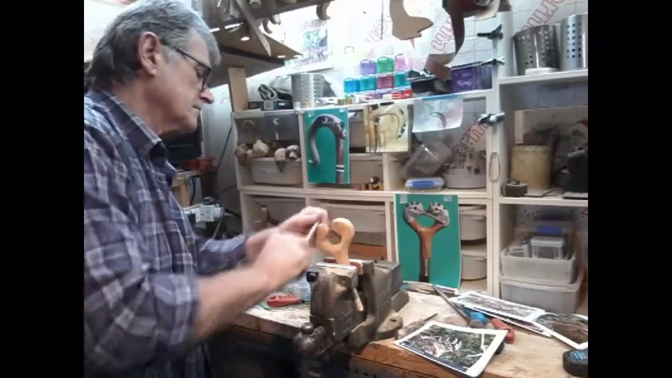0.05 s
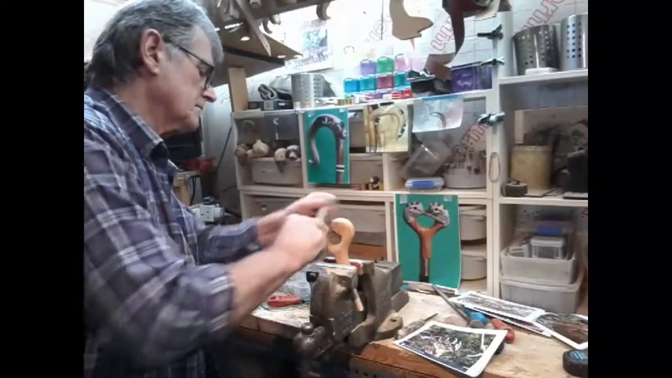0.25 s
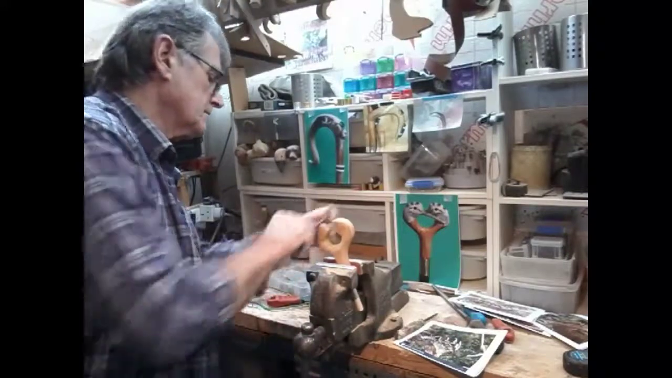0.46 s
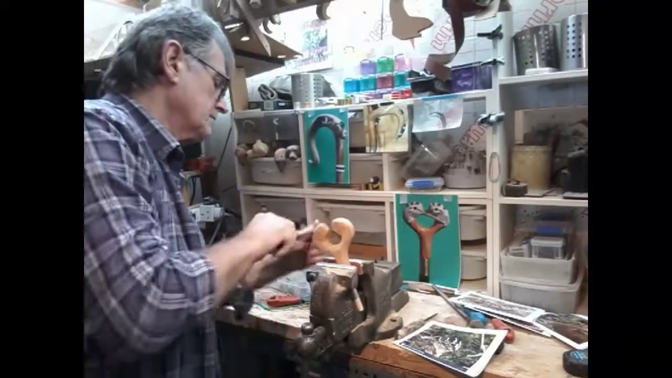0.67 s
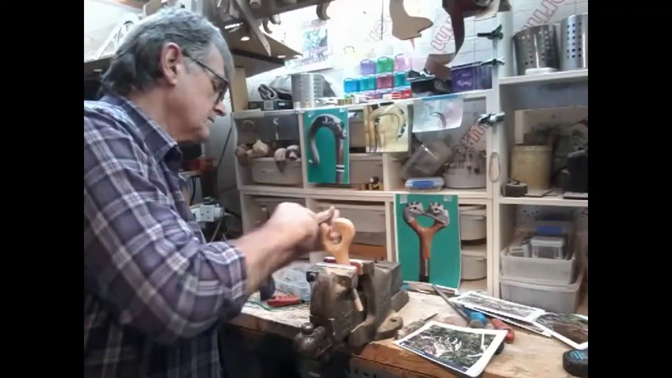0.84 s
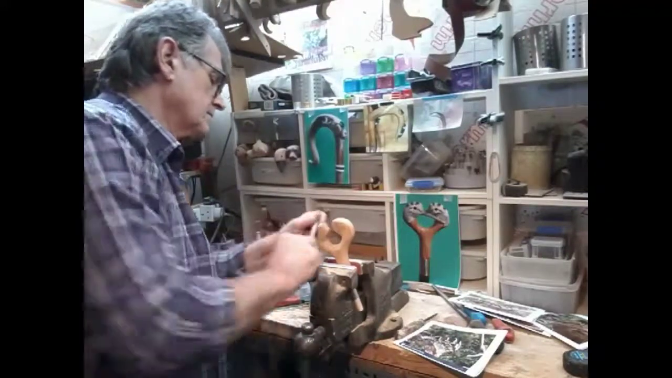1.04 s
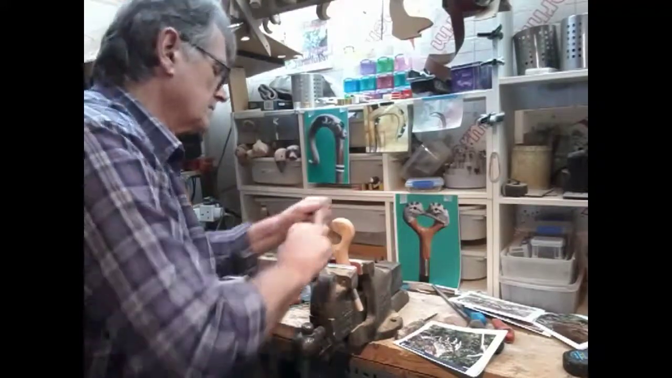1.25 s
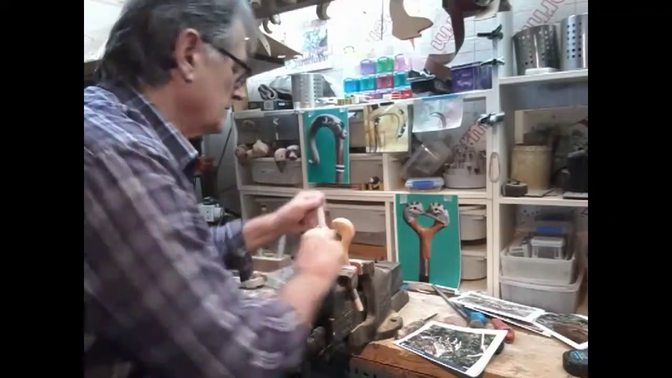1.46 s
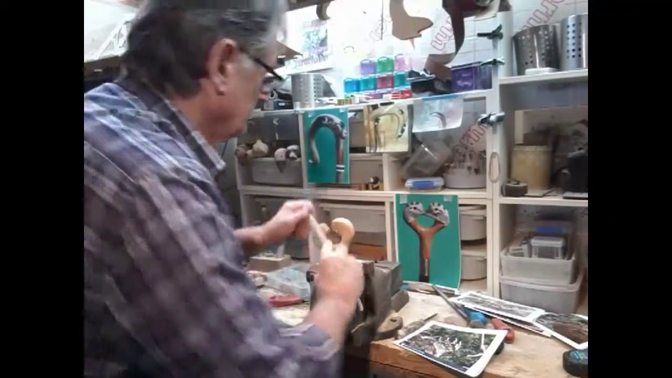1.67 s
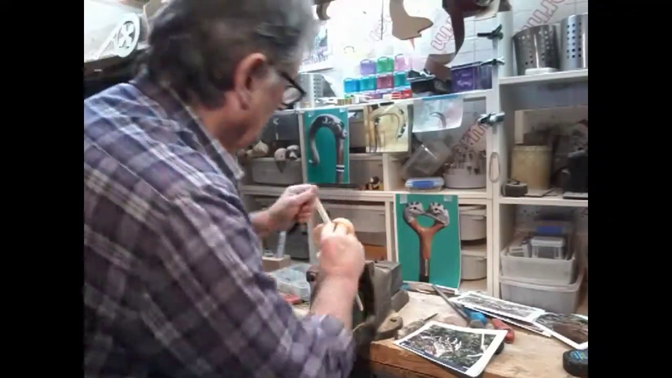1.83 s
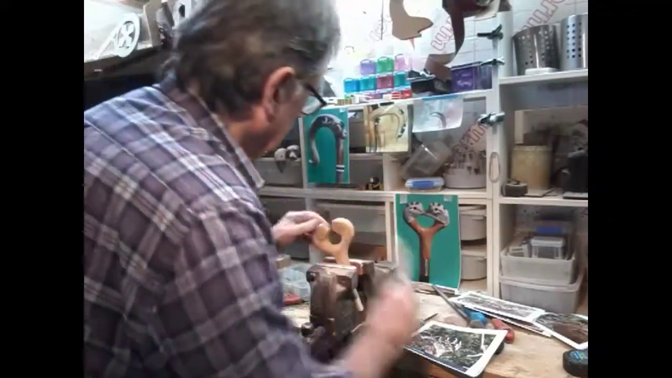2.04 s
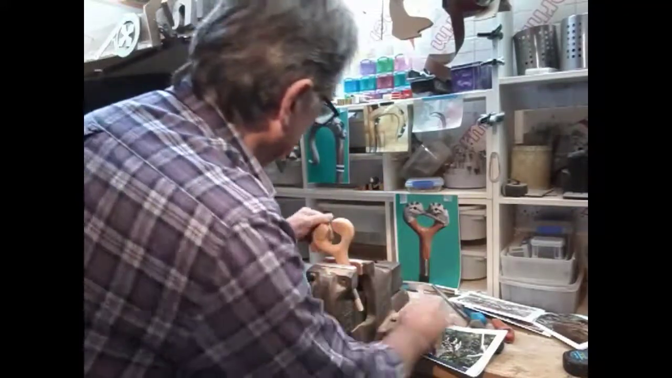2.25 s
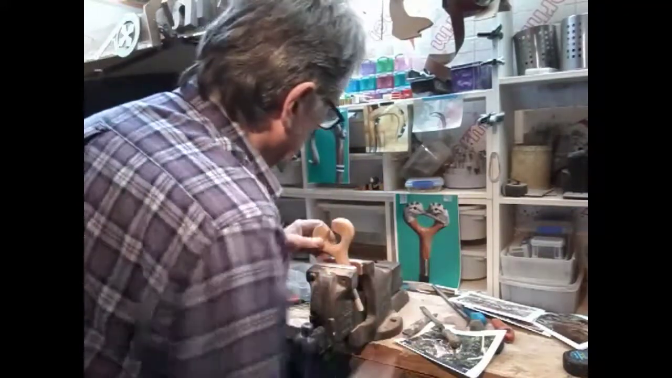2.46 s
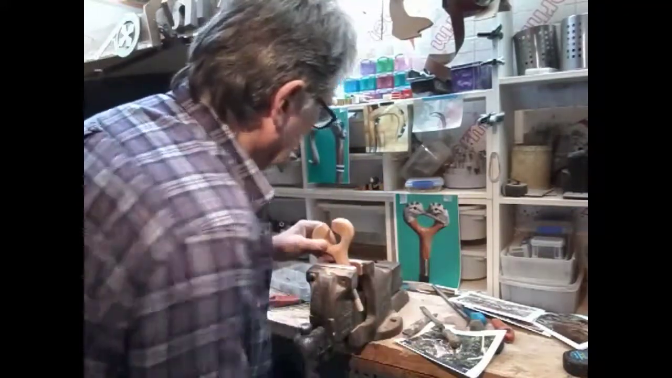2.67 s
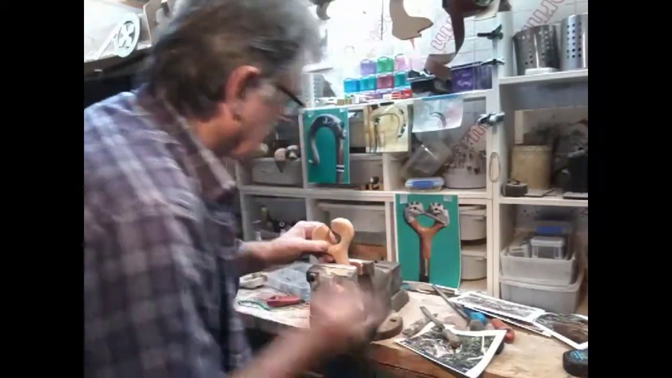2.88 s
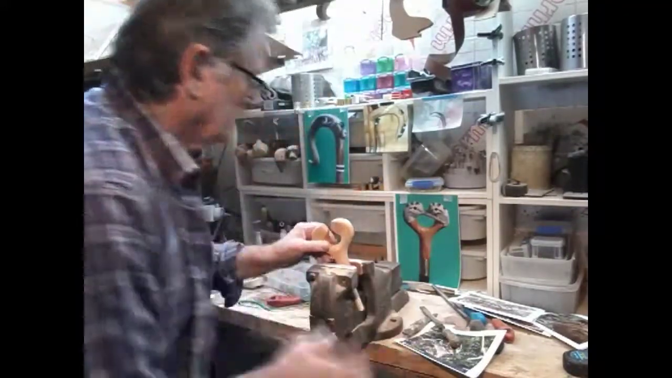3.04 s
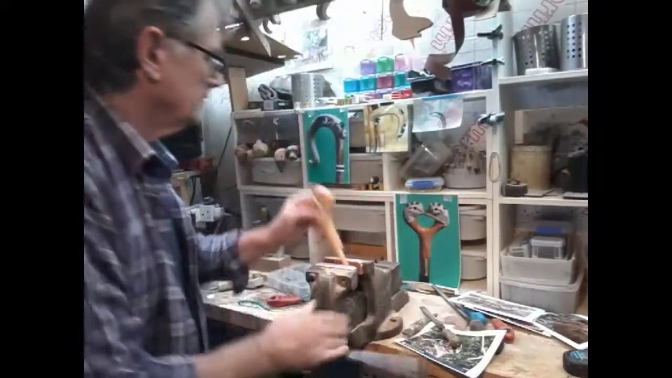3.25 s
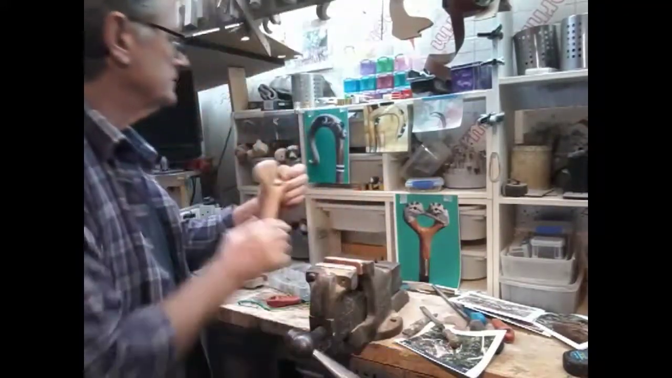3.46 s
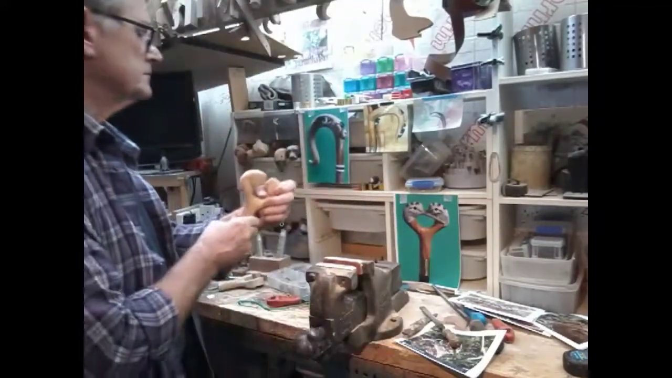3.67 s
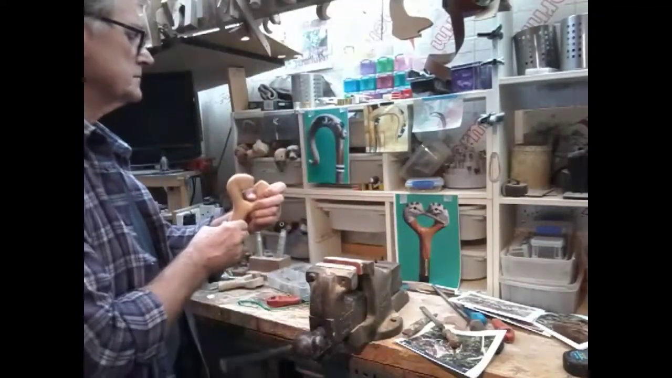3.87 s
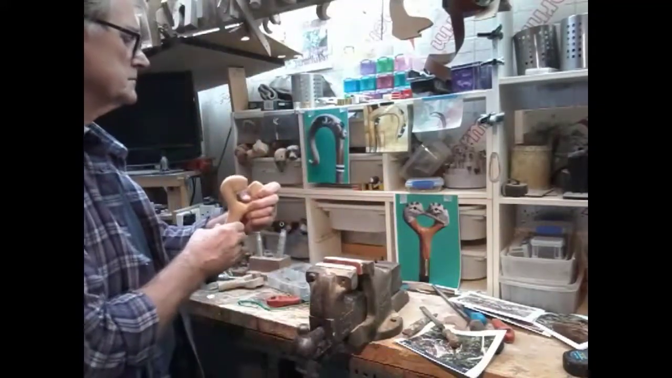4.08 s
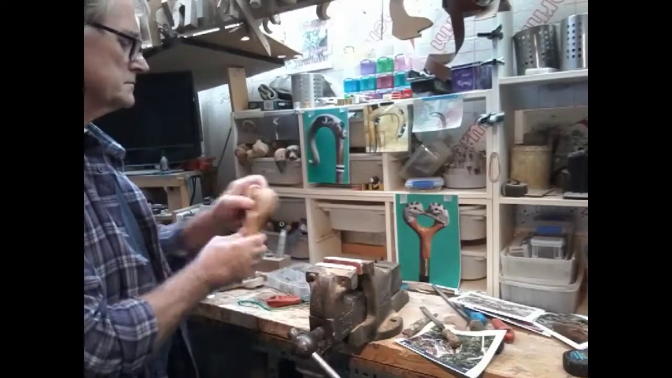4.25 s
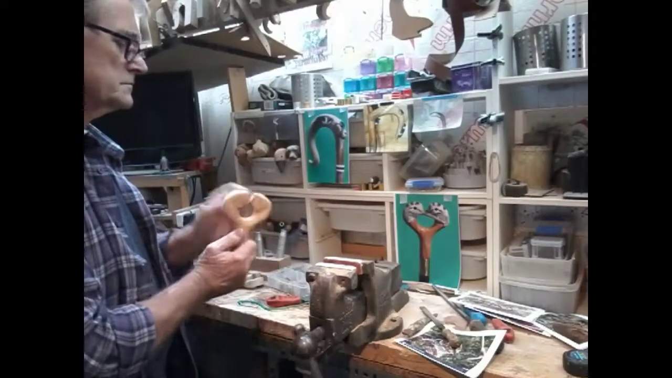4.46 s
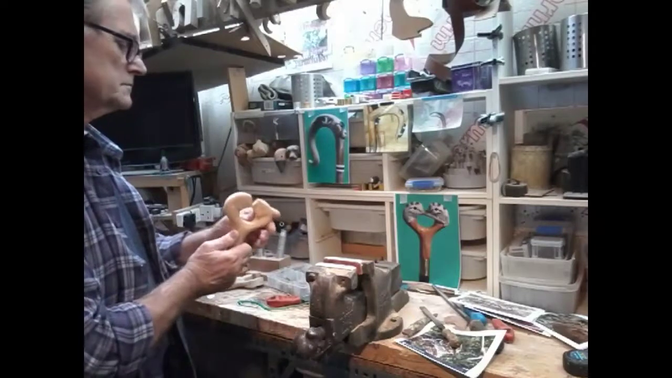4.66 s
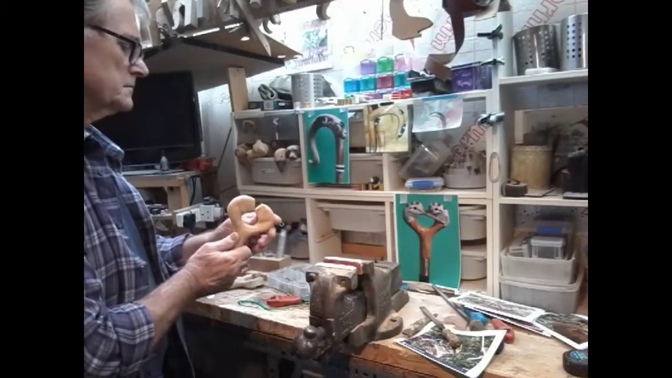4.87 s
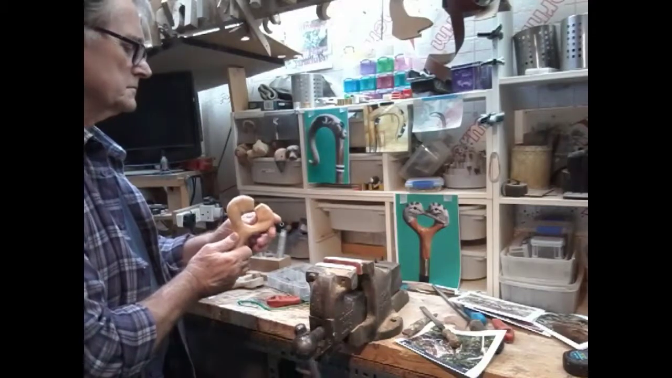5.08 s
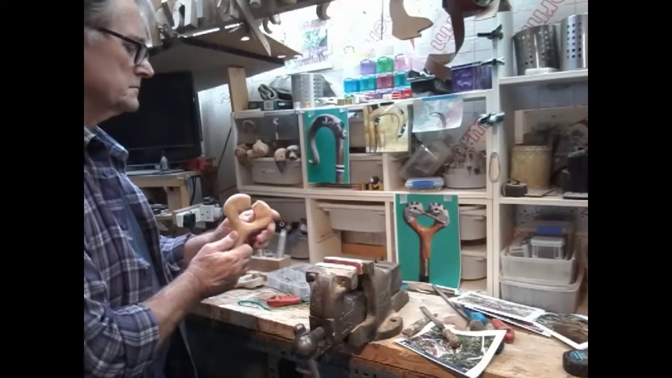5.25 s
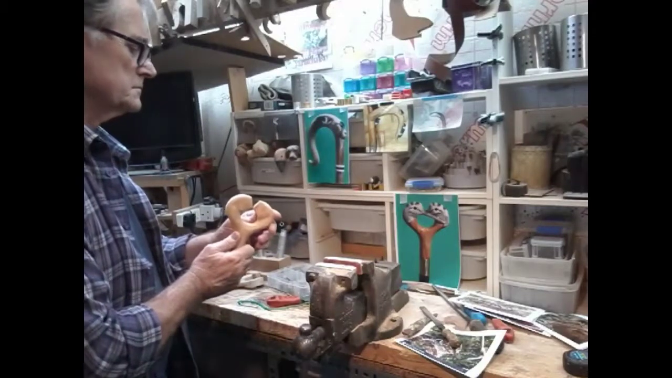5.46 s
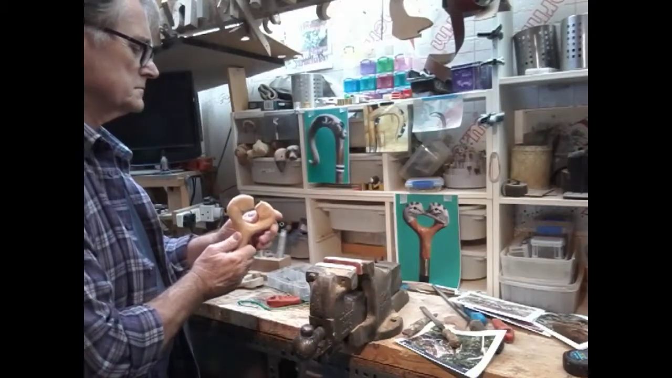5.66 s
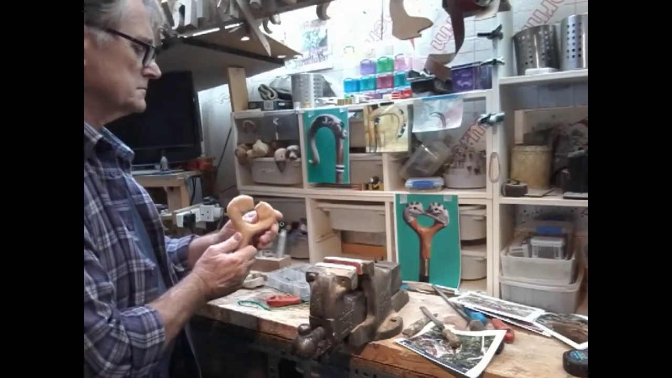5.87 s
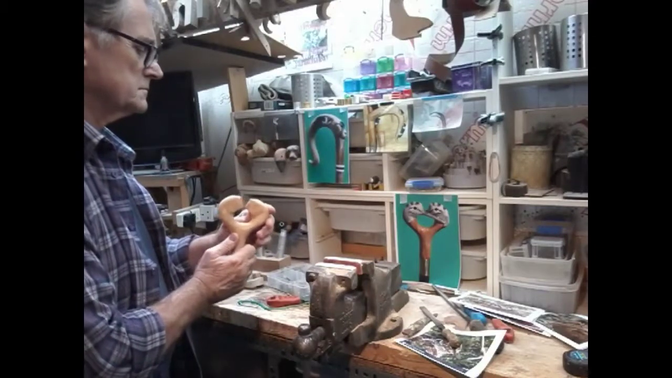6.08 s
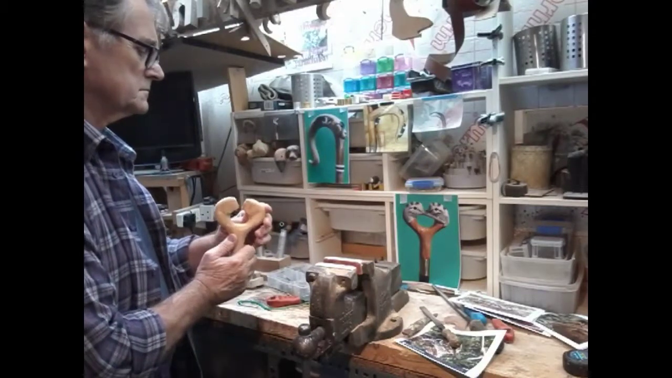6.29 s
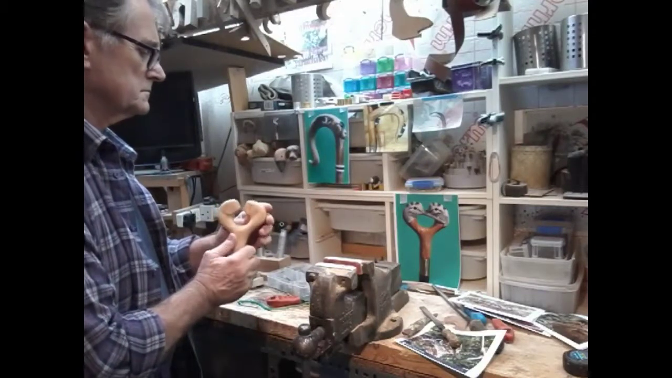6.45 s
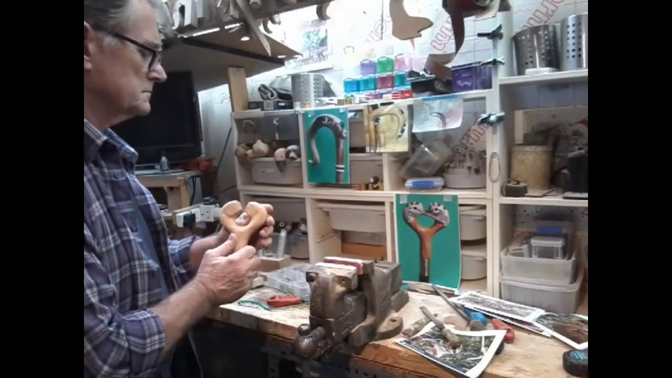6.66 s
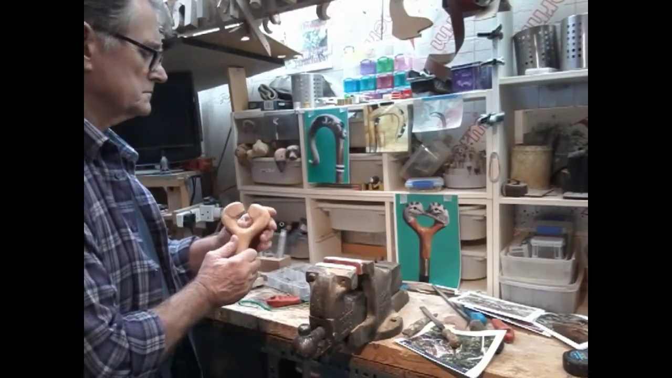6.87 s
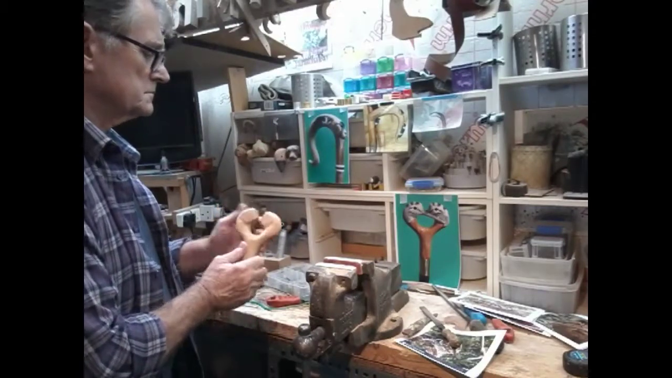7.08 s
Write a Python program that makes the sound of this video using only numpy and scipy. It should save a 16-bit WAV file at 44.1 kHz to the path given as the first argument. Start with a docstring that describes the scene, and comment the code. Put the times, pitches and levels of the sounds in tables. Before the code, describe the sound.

From the start, a hand file rasps across a wooden carving clamped in a vise: six short strokes, about three a second, each with a light tap and a gritty, woody scrape, ending near 1.8 seconds. After a brief pause, the file clatters onto the bench at 2.3 seconds, bouncing with a short steel ring. At 2.65 seconds a hard, tight double clank frees the vise screw, the loudest moment. The slack jaw knocks dully and the sliding steel handle clinks repeatedly until about 3.6 seconds, while the carving clacks lightly against the jaws around 3.3 seconds. Sparser, mostly softer clinks follow, clearest near 4.25, 5.25 and 5.7 seconds, with a faint last one at 6.1. Sleeves rustle softly over a low room rumble and a thin, high electrical whine until the end, around 7 seconds. One microphone stands beside the bench in a small workshop with short reflections.

```python
"""A hand file rasps six times across a wooden carving in a bench vise, its teeth tearing fibres
and ringing the wood. The file clatters onto the bench, a double blow frees the vise screw, and the
carving clacks out of the jaws while the sliding steel handle clinks to rest. Sleeves rustle over
a low room rumble and a thin electrical whine. One microphone, beside the bench in a small workshop."""
import sys
import numpy as np
from scipy import signal
from scipy.fft import rfft, irfft, next_fast_len
from scipy.io import wavfile
from scipy.ndimage import uniform_filter1d

SR = 44100
rng = np.random.default_rng(int(sys.argv[2]) if len(sys.argv) > 2 else 0)


def log_audio(samples):
    """Write samples as a 16-bit WAV file to the path given in sys.argv[1]."""
    # one column per channel
    frames = np.atleast_2d(samples).T
    # limit to full scale, then quantise
    limited = np.clip(frames, -1, 1)
    pcm = np.round(limited * 32767).astype(np.int16)
    wavfile.write(sys.argv[1], SR, pcm)


N = 313992
TAIL = SR // 2   # samples that a blow lasts

# decay of the workshop: pitch_hz, t60_s
WORKSHOP_DECAY = [(100, 0.47), (500, 0.27), (2000, 0.21), (6000, 0.2), (14000, 0.2)]
# arms and shirt moving: time_s, rustle_db, swish_db
SLEEVE_MOVES = [(0.0, -50.5, -64), (0.2, -53.5, -75), (0.54, -56.5, -63), (1.01, -49.5, -68),
                (1.13, -48.5, -69), (1.53, -57.5, -75), (1.78, -55, -61.5), (2.24, -56.5, -62),
                (2.72, -50, -69.5), (2.85, -47, -60.5), (3.25, -48.5, -57), (3.55, -50, -68),
                (3.73, -50.5, -70), (4.96, -55.5, -77), (5.69, -57, -80.5), (6.45, -63, -80.5),
                (6.88, -57, -80), (7.12, -54, -78.5)]
# spectra of the background: pitch_hz, density_db
RUMBLE_SPECTRUM = [(15, -49), (25, -28.5), (48, -3.5), (104, -0.5), (190, -15), (253, -13), (303, -29),
                   (328, -9), (612, -20), (881, -17.5), (1640, -31.5), (4190, -39), (5880, -36.5),
                   (9640, -47.5), (12500, -40), (16200, -76), (22000, -120)]
CLOTH_SPECTRUM = [(53, -39), (90, -5), (130, -3), (214, 1.5), (375, -15), (540, -13.5), (668, -20.5),
                  (963, -20), (4010, -43), (5890, -39), (9000, -47), (11700, -71.5), (19800, -120)]
SWISH_SPECTRUM = [(1000, 2.5), (1500, 1.5), (3000, -6.5), (4300, -11), (5300, -3.5), (6100, 3), (7200, -10),
                  (10000, -15.5), (13000, -21)]

# pushes of the file: start_s, grip_s, time_to_top_speed_s, length_s, top_teeth_per_s,
# bite_db, hiss_db, shudder_db, blade_db, jolt_db
FILE_STROKES = [ (0.037, 0.053, 0.11, 0.15, 874, -43.5, -45, -35, -38, -32.5),
                (0.375, .025, 0.061, 0.1, 642, -41.5, -43.5, -41, -39.5, -39),
                (0.65, 0.078, .115, 0.16, 720, -39, -41, -31, -37, -36.5),
                (1.014, 0.034, 0.09, 0.14, 666, -41.5, -44, -30.5, -39, -61),
                (1.359, .02, 0.053, 0.091, 740, -44.5, -49, -40, -38.5, -33),
                (1.632, 0.043, .08, 0.13, 725, -47, -50, -37.5, -44, -38)]
# how bite, hiss, shudder and blade (a row each) follow a push:
# lower_at_start_db, sag_db_per_s, release_db_per_s
STROKE_SHAPES = [(13.5, 4, 208), (28.3, 67, 146), (18.3, 12, 161.5), (26.6, 35, 260)]
# resonances of carving and file together: pitch_hz, width_hz, level_db
WOOD_RESONANCES = [(577, 91, 6.5), (916, 13, -1), (1197, 5.8, -0.5), (1489, 60, 4.5), (1700, 36, 6),
                   (2090, 136, -5.5), (2250, 9.3, -2.5), (2480, 17, -32), (2827, 57, -2), (3250, 58, -5),
                   (3460, 62, -2), (5970, 350, -0.5), (11820, 180, -18)]
# the file lands on the wood: start_s, tap_db, brightness_hz, thump_db
FILE_LANDINGS = [(0.038, -45, 2960, -37.5), (0.376, -35, 3970, -43.5), (0.652, -57, 1994, -43.5),
                 (1.012, -36.5, 5200, -63), (1.359, -32.5, 7100, -43), (1.632, -41.5, 4120, -47)]
# spectra of the file at work: pitch_hz, density_db
RASP_SPECTRUM = [(150, -59), (250, -9), (371, -1.5), (565, -18.5), (893, -7.5), (962, -15), (1430, -4),
                 (2260, -6), (2790, -25), (4800, -32), (6240, -46), (10600, -120)]
FIBRE_SPECTRUM = [(2200, -40), (3800, -10.5), (4400, -7.5), (5300, -4.5), (5750, -0.5), (6150, 4.5),
                  (6600, -7.5), (7500, -17), (10000, -21.5), (11300, -21.5), (11900, -29), (12700, -26),
                  (15000, -30)]
TAP_SPECTRUM = [(200, -41), (450, 7), (800, -5), (1500, 8), (2100, 9), (3200, 0.5), (4300, -11),
                (6200, -0.5), (7500, -23), (14000, -72)]

# the file drops on the bench: start_s, clatter_db, crack_db, ring_db
FILE_DROPS = [(2.2998, -26.5, -58, -35.5), (2.306, -22, -39.5, -32), (2.3863, -25, -32, -35.5)]
# the slack jaw knocks: start_s, knock_db, thud_db
JAW_KNOCKS = [(2.626, -52, -45.5), (2.672, -36, -32), (2.734, -41, -28.5), (3.065, -44.5, -50),
              (3.08, -44.5, -35), (3.164, -60, -40.5), (3.21, -69, -46.5), (3.449, -53, -40),
              (4.208, -53, -51), (4.465, -63.5, -60), (5.065, -59.5, -54.5), (5.531, -56.5, -64)]
# the handle is knocked against its stop: start_s, clank_db, ring_db
FREEING_BLOWS = [(2.646, -24, -25), (2.653, -20, -23.5)]
# the swinging handle strikes: start_s, ring_db, low_modes_extra_db, knock_db, jaw_ring_db,
# rebound_after_s, rebound_ring_relative_db, rebound_knock_relative_db
HANDLE_CLINKS = [(2.747, -44.5, -4, -42, -51, 0.029, -22, -12), (2.889, -32, 7, -46.5, -46.5, .015, -5, 5),
                 (2.954, -43.5, 5, -46.5, -59, 0.0086, 9, 10), (3.097, -28.5, 0, -32.5, -45, .014, 1, -7),
                 (3.376, -27, -1, -41, -40, .018, -12, -5.5),
                 (3.526, -48, -9, -45.5, -46.5, 0.01, -12, -18),
                 (3.616, -40, 6, -41.5, -39.5, 0.0084, -9, -9),
                 (3.811, -63, 24, -58.5, -65, 0.01, -17, -10), (3.882, -64, 20, -54.5, -69, .012, -26, -7),
                 (4.251, -35, 0, -46, -53.5, 0.0081, -7.5, -0.5),
                 (4.714, -65, 17, -65, -66.5, .015, -14, -11),
                 (4.805, -57, 16, -55.5, -59, .01, -10, -12.5),
                 (5.115, -54.5, 12.5, -61, -73, 0.017, -20, -12),
                 (5.2407, -35.5, 0, -58, -64, .006, 3, 3.5), (5.264, -37, 4.5, -46, -40, .012, -10, -14),
                 (5.681, -44.5, 10, -61.5, -53, .023, 4.5, 5),
                 (6.122, -56.5, 8.5, -55.5, -53, .015, -14.5, -11)]
# the carving bumps the jaws: start_s, clack_db, tick_db
CARVING_CLACKS = [(3.222, -37, -56), (3.326, -40, -58.5), (3.333, -45, -51)]
# spectra of the contacts: pitch_hz, density_db
CLATTER_SPECTRUM = [(53, -46), (90, -19), (177, -2.5), (250, -8), (315, 1.5), (397, -4.5), (491, 3.5),
                    (1440, -0.5), (1750, -5), (2570, -2), (3060, -15.5), (4500, 1.5), (5560, -4.5),
                    (6000, 4.5), (9000, -29), (11700, -53.5), (19800, -120)]   # file on bench
CRACK_SPECTRUM = [(4500, -32), (6800, 1), (8500, -4), (10000, -11), (12000, -0.5), (15500, -9.5)]   # the sharp edge of that clatter
IRON_SPECTRUM = [(150, -13), (400, 3), (750, 8.5), (1500, 5.5), (2400, 3.5), (2900, -0.5), (4200, -3),
                 (5000, -2), (6200, -9), (7100, -18), (8500, -24.5), (11000, -33.5), (15000, -52)]   # body of the vise
THUD_SPECTRUM = [(35, -29), (65, -4), (150, -6), (260, -5.5), (450, -4.5), (900, -13.5), (2000, -38.5)]   # bench under the vise
SLAM_SPECTRUM = [(53, -46.5), (90, -19), (167, -3.5), (332, -20), (765, -2.5), (1450, -16), (1690, -10),
                 (1840, -16), (2430, -13.5), (2760, -17), (3140, -9.5), (5030, -11.5), (6240, -7),
                 (9780, -27.5), (15000, -26.5)]   # handle on its stop
TICK_SPECTRUM = [(3500, -14.5), (5500, 6), (7000, -5), (9000, -7), (10000, -17.5), (12500, -19),
                 (15500, -26.5)]   # sharp steel contact
CLACK_SPECTRUM = [(300, -5), (900, -5.5), (2200, -2.5), (3000, -7), (4200, -10.5), (5100, 3.5), (6200, 1),
                  (6900, -8.5), (8000, -28), (12000, -23.5), (15000, -34)]   # wood on iron
# modes of the loose file, cast jaws, screw and steel handle: pitch_hz, level_db, t60_s
BLADE_MODES = [(1392, -3, 0.17), (2300, -5.5, .15), (4300, -3.5, .16), (4759, -1, .13), (5070, -2.5, 0.17),
               (5329, -2.5, 0.2), (5490, -8, .14), (6030, -1.5, .1), (6720, -3, 0.11), (9000, -11.5, .12),
               (11950, -25, 0.083)]
JAW_MODES = [(690, -15.5, .1), (1160, -10.5, 0.42), (1739, 0.5, 0.079), (2164, -7.5, 0.087),
             (2588, -0.5, .09), (3146, -4.5, .1), (3480, -6.5, 0.067), (4240, -7.5, .06), (4530, -1.5, .1),
             (5370, -8, .07), (5770, 1.5, 0.072)]
SCREW_MODES = [(660, -10, 0.24), (769, -10, 0.055), (1740, 2.5, 0.059), (2390, -3, .06), (3050, -8, .14),
               (3790, -19, 0.081), (3980, -2.5, 0.11), (6420, -1, 0.07), (6180, -16.5, 0.16),
               (7810, -16.5, .12), (8640, -7, 0.075)]
HANDLE_MODES = [(2058, -9, 0.067), (3934, -12, 0.09), (4036, -7, 0.13), (5850, -10, .06),
                (6000, -8.5, 0.085), (6335, 4.5, 0.086), (6500, -4.5, 0.17), (6425, -3, 0.12),
                (6800, -13.5, 0.031), (8250, -25, 0.1), (8930, -27.5, .08), (9200, -31, .08),
                (10540, -29.5, 0.14)]


def from_db(db):
    return 10 ** (np.asarray(db) / 20)


def rms_one(x):
    return x / np.sqrt(np.mean(x ** 2) + 1e-20)


def unit_blow(x):
    """Scales a blow to the energy of 30 ms at rms 1."""
    return x / np.sqrt(np.sum(x ** 2) / (.03 * SR) + 1e-20)


def at_hz(points, hz):
    """Reads a table on a log-frequency axis."""
    pitches_hz, values = np.transpose(points)
    return np.interp(np.log(np.maximum(hz, 1)), np.log(pitches_hz), values)


def coloured(x, spectrum):
    """Minimum-phase filter with the given spectrum, falling away beyond its ends."""
    size = next_fast_len(len(x) + 4096)
    size += size % 2
    hz = np.maximum(np.arange(size // 2 + 1) * SR / size, 1)
    octaves_out = np.abs(np.log2(hz / np.clip(hz, spectrum[0][0], spectrum[-1][0])))
    gain = from_db(at_hz(spectrum, hz) - 20 * np.minimum(octaves_out, 2))
    cepstrum = irfft(np.log(gain))
    cepstrum[1:size // 2] *= 2
    cepstrum[size // 2 + 1:] = 0
    return irfft(rfft(x, size) * np.exp(rfft(cepstrum)))[:len(x)]


def drift(per_s):
    """A random curve of rms 1 that turns per_s times a second."""
    knots = rng.standard_normal(int(N / SR * per_s) + 2)
    return rms_one(np.interp(np.arange(N) / SR * per_s, np.arange(len(knots)), knots))


def resonance(x, hz, width_hz):
    """Two-pole resonance with gain 1 at its peak."""
    r = np.exp(-np.pi * width_hz / SR)
    feedback = [1, -2 * r * np.cos(2 * np.pi * hz / SR), r * r]
    return signal.lfilter(np.array([1, 0, -1]) * (1 - r * r) / 2, feedback, x + 1e-18)


def steep_resonance(x, hz, width_hz):
    return resonance(resonance(x, hz, width_hz), hz, width_hz)


def add(track, start_s, sound):
    start = int(start_s * SR)
    track[start:start + len(sound)] += sound[:N - start]


def workshop(x, wet_db, build_s=0.0035):
    """Direct sound, then dense reflections from bench and shelves that die sooner in the treble."""
    t = np.arange(TAIL) / SR
    white, hz = rfft(rng.standard_normal(TAIL)), np.fft.rfftfreq(TAIL, 1 / SR)
    edges_hz = [0, *np.geomspace(250, 8000, 6), SR]
    tail = np.zeros(TAIL)
    for low, high in zip(edges_hz, edges_hz[1:]):
        band = irfft(white * (hz >= low) * (hz < high), TAIL)
        tail += band * from_db(-60 * t / at_hz(WORKSHOP_DECAY, np.sqrt(2) * low))
    tail *= np.minimum(t / build_s, 1) ** 2
    response = from_db(wet_db) * tail / np.sqrt(np.sum(tail ** 2))
    response[0] = 1
    return signal.fftconvolve(x, response)[:len(x)] / np.sqrt(1 + from_db(2 * wet_db))


def knock(spectrum, t60_s, wet_db):
    """A contact chatters briefly into many short, crowded modes; the room carries its tail."""
    chatter = rng.standard_normal(TAIL) * from_db(-60 * np.arange(TAIL) / SR / t60_s)
    return unit_blow(workshop(coloured(chatter, spectrum), wet_db))


def ringing(modes, wet_db, contact_s, low_db=0, top_db=0):
    """Struck metal rings in decaying modes; low_db and top_db shift the low and top modes' levels."""
    t, out = np.arange(TAIL) / SR, 0
    echoes = workshop(signal.unit_impulse(TAIL), wet_db)
    swell = 1 - np.exp(-t / contact_s)
    for hz, db, t60_s in modes:
        strength_db, detune = rng.standard_normal(2) * [1.5, .003]   # no two blows alike
        mode = np.sin(2 * np.pi * hz * (1 + detune) * t) * swell * from_db(-60 * t / t60_s)
        share_db = low_db * (hz < 5000) + top_db * (hz > 7500)
        in_room = unit_blow(signal.fftconvolve(mode, echoes)[:TAIL])
        out = out + from_db(db + strength_db + share_db) * in_room
    return unit_blow(out)


def room_tone(rumble_db=-59, whine_hz=13676, whine_db=-56, hiss_db=-76):
    """The workshop's low rumble, a steady electrical whine and faint hiss."""
    rumble = from_db(rumble_db) * rms_one(coloured(rng.standard_normal(N), RUMBLE_SPECTRUM))
    cycles = np.cumsum(whine_hz + 1.5 * drift(2)) / SR
    whine = from_db(whine_db) * np.sqrt(2) * np.sin(2 * np.pi * cycles)
    return rumble + whine + from_db(hiss_db) * rng.standard_normal(N)


def sleeves(flicker_db=3):
    """Cloth rubs unevenly as the arms move: a low rustle and a brighter swish."""
    t = np.arange(N) / SR
    times_s, rustle_db, swish_db = np.transpose(SLEEVE_MOVES)
    rubbing = rng.standard_normal(N) * from_db(flicker_db * drift(25))
    rustle = from_db(np.interp(t, times_s, rustle_db) + .5) * rms_one(coloured(rubbing, CLOTH_SPECTRUM))
    swish = from_db(np.interp(t, times_s, swish_db) - 1.5) * rms_one(coloured(rubbing, SWISH_SPECTRUM))
    return rustle + swish


def strokes(slow_teeth_per_s=480, surge_s=.05, skim_db=7.5, jolt_after_s=.016, jolt_width_s=.012):
    """Each push surges and slows; its sounds build, sag and die when the pressure is let off."""
    levels, teeth_per_s = np.zeros((4, N)), np.full(N, float(slow_teeth_per_s))
    for start_s, grip_s, rise_s, length_s, top_per_s, *layer_dbs, jolt_db in FILE_STROKES:
        t = np.arange(N) / SR - start_s
        surge = np.exp(-((t - rise_s) / surge_s) ** 2)
        teeth_per_s += (top_per_s - slow_teeth_per_s) * surge
        grip = np.clip(t / grip_s, 0, 1) ** 2
        to_go = np.clip(1 - t / rise_s, 0, 1) ** 2
        past_top_s, past_end_s = np.maximum(t - rise_s, 0), np.maximum(t - length_s, 0)
        bite, hiss, shudder, blade = [
            grip * from_db(db - lower_db * to_go - sag * past_top_s - release * past_end_s)
            for db, (lower_db, sag, release) in zip(layer_dbs, STROKE_SHAPES)]
        shudder *= from_db(-skim_db * surge)   # at speed the teeth skim and rock the carving less
        jolt = (t > 0) * from_db(jolt_db) * np.exp(-((t - jolt_after_s) / jolt_width_s) ** 2)
        levels += [bite, hiss, shudder + jolt, blade]
    return levels, teeth_per_s


def carving(force, shares=np.ones(len(WOOD_RESONANCES))):
    """The clamped wood and the file on it ring together, each resonance with its share."""
    return sum((-1) ** k * from_db(db) * shares[k] * resonance(force, hz, width_hz)
               for k, (hz, width_hz, db) in enumerate(WOOD_RESONANCES))


def filing(jitter=.07, tooth_share=.26, wander_db=3, rasp_db=-4, blade_db=-6, shudder_db=-7):
    """Rows of teeth catch the wood at a rate set by the stroke; each catch tears a burst of fibres."""
    (bite, hiss, shudder, blade), teeth_per_s = strokes()
    teeth_passed = np.cumsum(teeth_per_s * (1 + jitter * drift(250))) / SR
    grain = from_db(2 * drift(300))
    catches = np.diff(np.floor(teeth_passed), prepend=0) * grain
    fibres = rms_one(rng.standard_normal(N) * np.exp(-2 * (teeth_passed % 1)) * grain)
    force = workshop(tooth_share * rms_one(catches) + fibres, wet_db=-2.5)
    # the moving contact favours now one resonance, now another
    shares = [from_db(wander_db * drift(25.06)) for _ in WOOD_RESONANCES]
    wood = rms_one(carving(force, shares))
    rasp = from_db(rasp_db) * rms_one(coloured(force, RASP_SPECTRUM))
    cut = rms_one(coloured(fibres, FIBRE_SPECTRUM))
    # late in a stroke the blade overhangs the work and sings
    singing = from_db(blade_db) * rms_one(steep_resonance(force, hz=2340, width_hz=540))
    # the beat of the teeth rocks the carving in the jaws; held level, so the stroke sets its strength
    beat = np.sin(2 * np.pi * teeth_passed) + .27 * fibres
    rocking = workshop(steep_resonance(beat, hz=550, width_hz=390), wet_db=0)
    rocking *= from_db(shudder_db) / np.sqrt(uniform_filter1d(rocking ** 2, size=1500) + 1e-12)
    return bite * (wood + rasp) + hiss * cut + blade * singing + shudder * rocking


def file_landings(flutter_db=7.5, ring_db=-13, thump_after_s=.009, thump_hz=510):
    """Steel taps wood, echoes flutter off the bench, and the carving gives in the jaws with a thump."""
    out = np.zeros(N)
    for start_s, tap_db, tap_hz, thump_db in FILE_LANDINGS:
        for delay_s, db, bright_hz in ((0, tap_db, tap_hz), (thump_after_s, thump_db, thump_hz)):
            tap = unit_blow(coloured(signal.unit_impulse(TAIL), TAP_SPECTRUM))
            tap += from_db(flutter_db) * knock(TAP_SPECTRUM, t60_s=.15, wet_db=-8)
            tap += from_db(ring_db) * unit_blow(carving(tap))
            soft_contact = signal.butter(2, bright_hz, fs=SR, output="sos")
            add(out, start_s + delay_s, from_db(db) * unit_blow(signal.sosfilt(soft_contact, tap)))
    return out


def file_put_down():
    """One end of the file hits the bench, bounces, and the other end follows."""
    out = np.zeros(N)
    for start_s, clatter_db, crack_db, ring_db in FILE_DROPS:
        add(out, start_s, from_db(clatter_db) * knock(CLATTER_SPECTRUM, t60_s=.026, wet_db=1.5))
        add(out, start_s, from_db(crack_db) * knock(CRACK_SPECTRUM, t60_s=.073, wet_db=-8.5))
        add(out, start_s, from_db(ring_db) * ringing(BLADE_MODES, wet_db=-9, contact_s=.0005))
    return out


def iron_blow(knock_db, jaw_db, thud_db):
    """A blow inside the vise: the iron knocks, the jaws ring, the bench thuds."""
    return (from_db(knock_db) * knock(IRON_SPECTRUM, t60_s=.06, wet_db=5)
            + from_db(jaw_db) * ringing(JAW_MODES, wet_db=0, contact_s=.0022)
            + from_db(thud_db) * knock(THUD_SPECTRUM, t60_s=.099, wet_db=-5.5))


def slack_jaw():
    """The slack jaw knocks on its screw."""
    out = np.zeros(N)
    for start_s, knock_db, thud_db in JAW_KNOCKS:
        add(out, start_s, iron_blow(knock_db, jaw_db=knock_db - 5.5, thud_db=thud_db))
    return out


def vise_freed():
    """A hard double blow of the handle on its stop frees the screw and sets it ringing."""
    out = np.zeros(N)
    for start_s, clank_db, ring_db in FREEING_BLOWS:
        add(out, start_s, from_db(clank_db) * knock(SLAM_SPECTRUM, t60_s=.09, wet_db=-5.5))
        add(out, start_s, from_db(ring_db) * ringing(SCREW_MODES, wet_db=-3, contact_s=.00075))
    return out


def swinging_handle():
    """The sliding handle strikes its collar and rebounds once; each contact also shakes the vise."""
    out = np.zeros(N)
    for start_s, ring_db, low_db, knock_db, jaw_db, *rebound in HANDLE_CLINKS:
        for delay_s, ring_change_db, body_change_db in ((0, 0, 0), rebound):
            ring = ringing(HANDLE_MODES, wet_db=-5, contact_s=.0014, low_db=low_db, top_db=-1.5)
            tick = from_db(knock_db - 10) * knock(TICK_SPECTRUM, t60_s=.066, wet_db=-.5)
            body = tick + iron_blow(knock_db, jaw_db, thud_db=knock_db - 6)
            clink = from_db(ring_db + ring_change_db) * ring + from_db(body_change_db) * body
            add(out, start_s + delay_s, clink)
    return out


def carving_lifted():
    """Hard wood clacks briefly against the iron jaws on its way out."""
    out = np.zeros(N)
    for start_s, clack_db, tick_db in CARVING_CLACKS:
        add(out, start_s, from_db(clack_db) * knock(CLACK_SPECTRUM, t60_s=.044, wet_db=0))
        add(out, start_s, from_db(tick_db) * knock(TICK_SPECTRUM, t60_s=.022, wet_db=-9))
    return out


def scene():
    """Everything is heard in mono from one place beside the bench."""
    hand_file = filing() + file_landings() + file_put_down()
    vise = vise_freed() + swinging_handle() + slack_jaw() + carving_lifted()
    return (hand_file + vise + sleeves() + room_tone())[None]


def record(dry, low_cut_hz=45, top_cut_hz=15500):
    """The microphone loses the deep bass; the top is cut steeply."""
    low_cut = signal.butter(4, low_cut_hz, "high", fs=SR, output="sos")
    top_cut = signal.ellip(10, .1, 80, top_cut_hz, fs=SR, output="sos")
    return signal.sosfilt(top_cut, signal.sosfilt(low_cut, dry))


dry = scene()
out = record(dry)
log_audio(out)
```